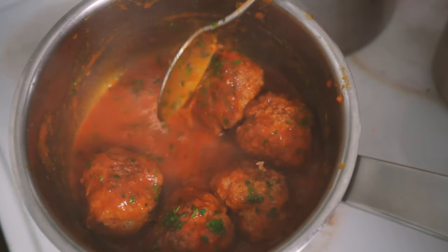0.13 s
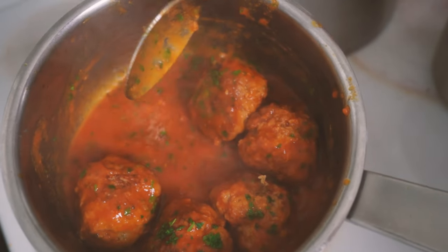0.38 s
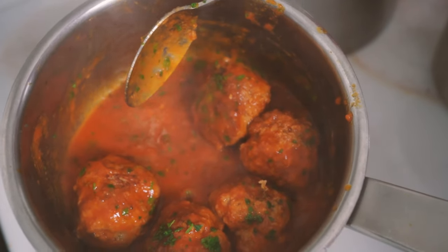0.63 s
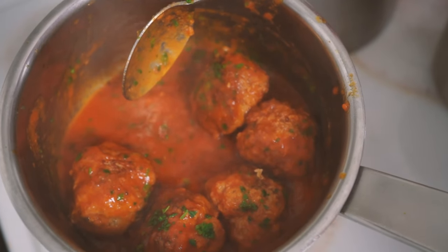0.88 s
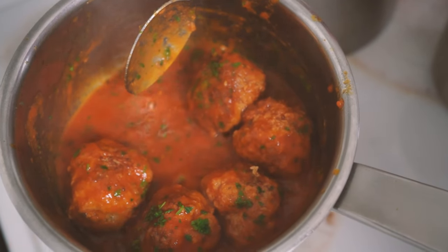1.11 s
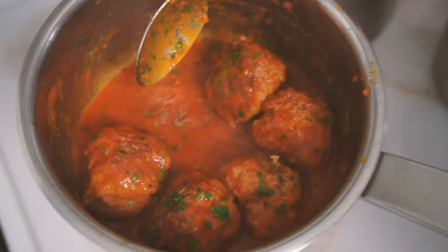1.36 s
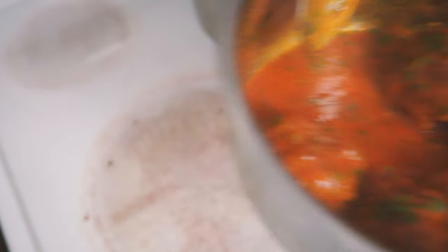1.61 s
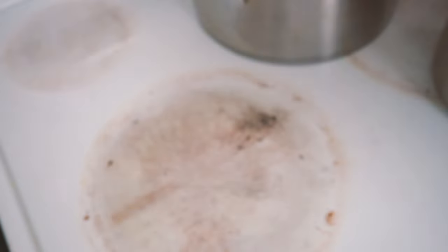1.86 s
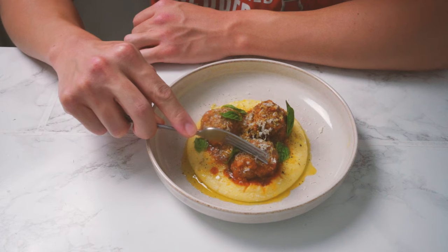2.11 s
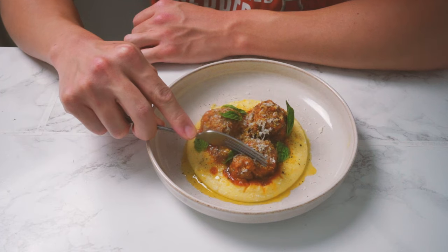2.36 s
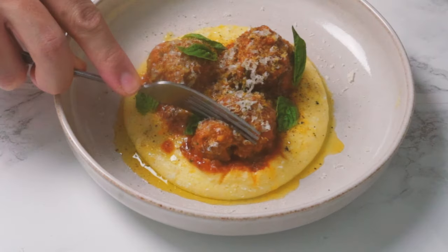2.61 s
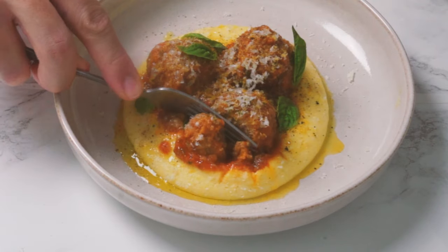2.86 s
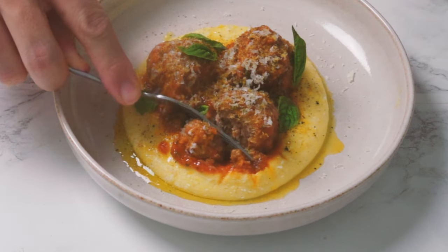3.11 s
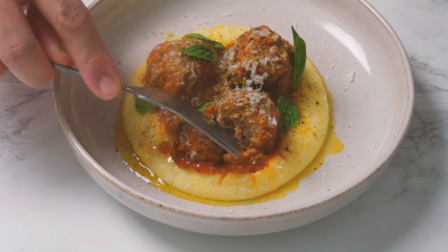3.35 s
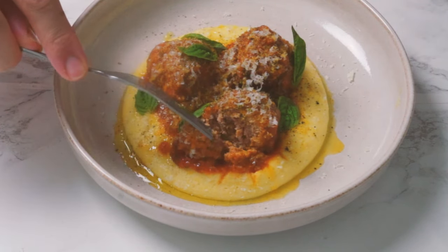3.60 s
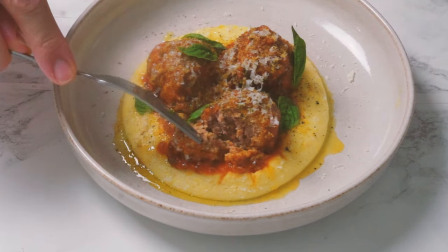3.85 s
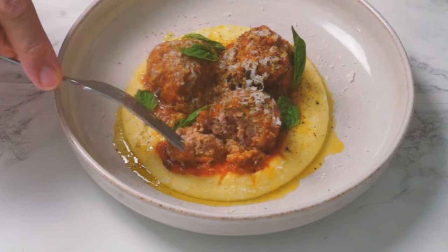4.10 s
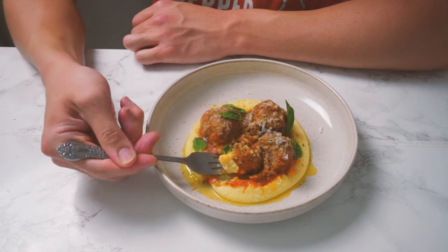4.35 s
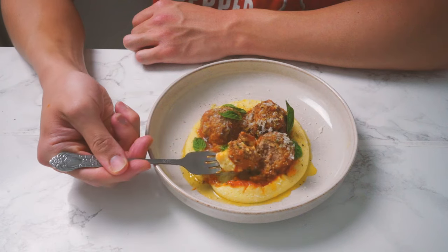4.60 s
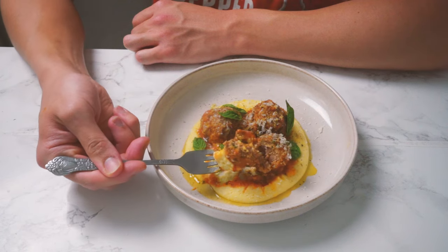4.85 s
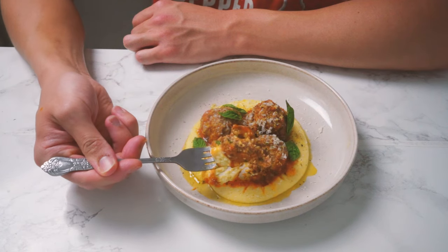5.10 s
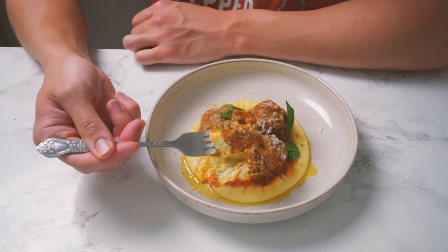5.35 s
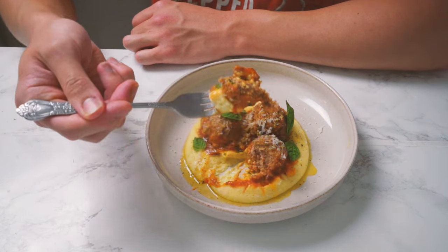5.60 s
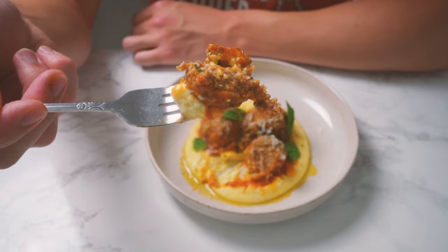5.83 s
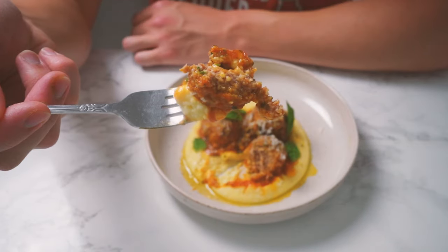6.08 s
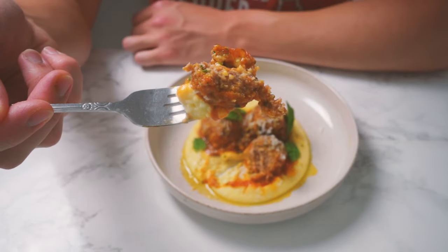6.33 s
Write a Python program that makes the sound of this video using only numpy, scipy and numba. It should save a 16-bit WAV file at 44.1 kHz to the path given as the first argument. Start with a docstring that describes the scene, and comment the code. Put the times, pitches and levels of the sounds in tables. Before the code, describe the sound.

From 0 to 1.95 seconds, thick sauce simmers close up in a steel pot: rapid crisp pops, wet snaps and fine fizz, brightest at the start, then duller and surging between short pauses. At about 0.34 a spoon hits the rim with a very loud, hard crack and a clear metallic ring fading over a few tenths of a second. Deep, soft low flutter shakes beneath. At 1.95 the boil stops abruptly, leaving a quiet counter with low fan hum, airy hiss and a thin fridge whine. From 2.5 to 3.3 a fork parts soft food with tiny high wet ticks, the strongest snap at 3.24. Sparse faint ticks follow. At 4.54 the fork clinks once on a ceramic bowl, ringing briefly in the small hard room. A very faint rustle passes around 5.5, with slight low flutter near 5.75; then drone until about 6.4.

```python
"""Thick sauce simmers in a steel pot: small air cavities ring and their films snap, and a spoon soon knocks the rim.
Then, at a stone counter, a fork cuts soft food with tiny wet ticks, rustles and strikes the ceramic bowl once.
The blows are a noisy crack and a set of fading tones; a small hard kitchen rings briefly after every sound.
Throughout, a fan (shaped noise) and a fridge (steady tones and hiss) drone, and the camera mount flutters deeply."""
import sys
import numpy as np
from scipy import signal
from scipy.fft import rfft, irfft
from scipy.io import wavfile
from scipy.ndimage import uniform_filter1d
from numba import njit

SR = 44100
rng = np.random.default_rng(int(sys.argv[2]) if len(sys.argv) > 2 else 0)


def inscribe(sig):
    """Save sig as 16-bit PCM at rate SR to the path in sys.argv[1].

    A 1-D sig is mono; a 2-D sig holds one channel per row.
    Samples are clipped to [-1, 1] before scaling.
    """
    pcm = np.round(np.clip(np.atleast_2d(sig).T, -1, 1) * 32767)
    wavfile.write(sys.argv[1], SR, pcm.astype(np.int16))


def gain_from_db(level_db):
    """Convert decibel levels to linear amplitude factors (20 dB per decade)."""
    decades = np.asarray(level_db, float) / 20
    return 10 ** decades


N = 284867
T = np.arange(N) / SR
BIN_HZ = np.arange(N // 2 + 1) * SR / N
CUT_S = 1.955  # the scene cuts from stove to counter

# strength of the boil, surging and pausing: (time [s], level of the coarse fizz [dB])
BOIL = [(0.01, -37), (0.07, -41), (0.115, -52), (0.18, -50), (0.22, -39), (0.31, -42), (0.56, -43),
        (0.63, -64.5), (0.76, -48), (0.95, -56.5), (1.02, -44), (1.09, -68.5), (1.15, -69), (1.2, -45),
        (1.385, -46.5), (1.42, -59.5), (1.47, -36), (1.51, -57), (1.57, -42.5), (1.64, -57.5), (1.7, -64),
        (1.75, -41.5), (1.88, -62), (1.93, -58.5)]


def level(x, db):
    """Scale to an rms level."""
    return x * gain_from_db(db) / np.sqrt(np.mean(x ** 2))


def band(x, hz, width):
    """Two-pole resonance, gain 1 at the centre."""
    return signal.lfilter(*signal.iirpeak(min(hz, .45 * SR), hz / width, SR), x)


def walk(rate):
    """Slow random wander with a spread near 1, made of random steps smoothed twice."""
    k = int(SR / rate)
    steps = np.repeat(rng.standard_normal(N // k + 1), k)
    return 1.3 * uniform_filter1d(uniform_filter1d(steps, k), k)[:N]


def coloured(power):
    """Noise with the given power in each frequency bin."""
    return irfft(rfft(rng.standard_normal(N)) * np.sqrt(power * len(power)), N)


def peaks(table):
    """Power per bin of steep resonances, each summing to its dB."""
    total = 0
    for hz, width, db in table:
        shape = 1 / (1 + (2 * (BIN_HZ - hz) / width) ** 2) ** 2
        total = total + gain_from_db(db) ** 2 * shape / shape.sum()
    return total


def echo(x, t60, db, damp_hz):
    """Dense hard-surface reflections, the treble dying first."""
    t = np.arange(SR // 2) / SR
    noise = rng.standard_normal(len(t)) * (t > .0025)  # nothing returns in the first 2.5 ms
    low = signal.lfilter(*signal.butter(1, damp_hz, fs=SR), noise)
    high = noise - low
    tail = low * np.exp(-np.log(1000) * t / t60) + high * np.exp(-np.log(1000) * t / (0.61 * t60))
    return x + gain_from_db(db) * signal.fftconvolve(x, tail / np.sqrt(np.sum(tail ** 2)))[:N]


@njit
def grains(start, gain, hz, cycles, glide, rise, count):
    """Damped sines that swell over a cycle or so; the pitch climbs as each cavity closes."""
    out = np.zeros(count)
    for j in range(len(start)):
        size = int(cycles[j] / hz[j] * SR)  # samples until 60 dB down
        phase = 0.
        for i in range(min(size, count - start[j])):
            phase += 2 * np.pi * hz[j] * (1 + glide * i / size) / SR
            swell = 1 - np.exp(-phase / (2 * np.pi * rise))
            fade = np.exp(-np.log(1000) * i / size)
            out[start[j] + i] += gain[j] * swell * fade * np.sin(phase)
    return out


def pops(s, db, hz, snap_db, cycles, snap_hz, snap_cycles, glide, rise):
    """Each burst rings a small air cavity and its film snaps with a broad click."""
    start = (s * SR).astype(np.int64)
    fade = np.log(1000) / cycles
    crest = rise * np.log(1 + 1 / (fade * rise))  # cycles until swell and fade balance
    peak = (1 - np.exp(-crest / rise)) * np.exp(-fade * crest)
    ring = grains(start, gain_from_db(db) / peak, hz, 0 * hz + cycles, glide, rise, N)
    snap = grains(start, gain_from_db(snap_db), 0 * hz + snap_hz, 0 * hz + snap_cycles, 0., 0.2, N)
    return ring + snap


def dulling(s):
    """Treble change in dB by time s: the boil is brightest at first and loses up to 15 dB."""
    return -15 * (1 - np.exp(-s / .6))


def bubbles():
    """The loud pops, lesser ones at random that follow the strength of the boil, and tiny high blips around each."""
    # loud pops in the sauce, and one low plop as the spoon settles:
    # (time [s], peak of the ring [dB], starting pitch [Hz])
    loud_pops = [(0.0079, -19, 5000), (0.0161, -20, 4900), (0.0246, -21, 5700), (0.0307, -23, 4090),
                 (0.0532, -20, 5200), (0.0566, -22.5, 4950), (0.1098, -31, 3140), (0.1416, -27, 8300),
                 (0.145, -17, 5380), (0.1468, -22, 6500), (0.2042, -24, 6930), (0.2246, -23, 4520),
                 (0.235, -25, 2760), (0.26, -26, 5080), (0.2783, -25, 3880), (0.2968, -14, 3660),
                 (0.2982, -21, 8200), (0.321, -20, 2630), (0.3331, -18, 4000), (0.426, -28.5, 796),
                 (0.4405, -19, 4800), (0.5283, -20, 3550), (0.54, -22, 3620), (0.546, -29, 8750),
                 (0.5519, -26, 3680), (0.565, -29, 10500), (0.5719, -30, 7150), (0.5839, -25, 5080),
                 (0.608, -25.5, 5020), (0.6516, -25.5, 4350), (0.6616, -28.5, 6140), (0.6939, -29, 3400),
                 (0.7451, -19.5, 5000), (0.7724, -17, 4310), (0.8146, -26, 4520), (0.8464, -28, 4610),
                 (0.8531, -29.5, 7100), (0.8923, -22.5, 4400), (0.9245, -27, 4020), (0.9735, -27, 6000),
                 (1.0095, -18, 5020), (1.0351, -23.5, 5540), (1.1697, -31.5, 3190), (1.1873, -28.5, 3270),
                 (1.1995, -22.5, 5120), (1.2136, -19.5, 3630), (1.2414, -21, 3570), (1.2624, -23, 3830),
                 (1.2729, -22, 5000), (1.297, -21, 3320), (1.3233, -15, 3330), (1.3562, -23, 4850),
                 (1.3664, -25, 3520), (1.3764, -22, 3700), (1.4428, -30, 5730), (1.4558, -27, 3750),
                 (1.4629, -19.5, 5100), (1.4734, -24, 3540), (1.5263, -28, 3270), (1.5307, -27, 5000),
                 (1.5627, -26.5, 3190), (1.5675, -24, 5460), (1.6, -27, 5600), (1.6152, -30.5, 4750),
                 (1.6681, -26, 8950), (1.7258, -26.5, 3750), (1.7304, -27, 7620), (1.7349, -23, 3160),
                 (1.7441, -18.5, 5120), (1.7621, -23, 5400), (1.7741, -25.5, 2630), (1.8084, -27.5, 1760),
                 (1.8150, -32, 1850), (1.8203, -29, 2280), (1.8421, -30.5, 5200), (1.8525, -29.5, 3430),
                 (1.8948, -30.5, 5250), (1.9168, -34, 2860)]
    when, size, pitch = rng.random((70, 3)).T
    s = when * CUT_S
    lesser_db = np.interp(s, *np.transpose(BOIL)) + 13 + 8.0 * size
    lesser = np.transpose([s, lesser_db, 3000. * (1 + 1.2 * pitch ** 1.5)])
    s, db, hz = np.vstack([loud_pops, lesser]).T
    snap_db = db - 5 + dulling(s) + 4.3 * rng.standard_normal(len(s))
    # six tiny random high blips scattered just before and after each pop
    spread_s, blip_db = .012, 3  # blip_db: strength of the strongest against the snap
    late, size, pitch = rng.random((len(s), 6, 3)).T
    start = ((s + spread_s * (late - .25)) * SR).clip(0).astype(np.int64).ravel()
    gain = gain_from_db(snap_db + blip_db - 9.0 * size).ravel()
    blips = grains(start, gain, 3000. * 4.6 ** pitch.ravel(), 0 * gain + 12.0, .05, .8, N)
    ringing = pops(s, db, hz, snap_db, cycles=16, snap_hz=10000., snap_cycles=3.5, glide=.08, rise=0.96)
    return ringing + blips


def fizz():
    """Swarms of small bubbles of scattered size, coarse and fine; pauses silence the fine ones less."""
    coarse_db = np.interp(T, *np.transpose(BOIL))
    fine_db = coarse_db - 6 + dulling(T) - .35 * (coarse_db + 40)
    out = 0
    for db, hz, spread, scatter in ((coarse_db, 3800., .38, 4.2), (fine_db, 10000., .28, 4.5)):
        chance = rng.random((1300, 3))
        start = (chance[:, 0] * CUT_S * SR).astype(np.int64)
        pitch = np.clip(hz * np.exp(spread * rng.standard_normal(len(chance))), 800, .4 * SR)
        size = gain_from_db(-scatter * np.log(chance[:, 1] + 0.0032))  # a few much louder than the rest
        swarm = grains(start, size, pitch, 4.0 + 11.0 * chance[:, 2], .1, .6, N)
        out = out + swarm / np.std(swarm[T < CUT_S]) * gain_from_db(db)
    return out


def air():
    """Power per bin of the fan's smooth broad hiss, summing to one."""
    # shape of the broad air noise: (frequency [Hz], relative density [dB per Hz])
    air_shape = [(40, -15.5), (100, -27), (400, -30), (1000, -7.5), (1500, -8.5), (2200, -17.5),
                 (3200, -19), (6000, -26), (8000, -32), (16000, -37)]
    hz, db = np.transpose(air_shape)
    power = gain_from_db(np.interp(np.log(BIN_HZ + 1), np.log(hz), db)) ** 2
    return power / power.sum()


def fan_drone(stove):
    """Fan noise swollen by the kitchen's standing waves, other ones at each place; its level wanders slowly."""
    # standing waves at the stove: (frequency [Hz], width 6 dB down [Hz], level [dB])
    stove_hum = [(95, 30, -70), (151, 30, -64), (198, 30, -58.5), (259.7, 28, -51.5), (326.1, 25.9, -54.5),
                 (390, 30, -67.5), (530.6, 60, -63), (650, 170, -60.5), (832, 310, -50), (1101.2, 301, -61)]
    # standing waves at the counter: (frequency [Hz], width 6 dB down [Hz], level [dB])
    counter_hum = [(95, 8.3, -63.5), (156, 29, -67.5), (194.2, 20.5, -56), (214, 13, -57), (259, 16, -55.5),
                   (281.2, 17, -56), (329.7, 26.7, -51), (391, 27, -67), (454.4, 35, -69), (528, 45, -62),
                   (601, 80, -63), (751, 161, -59), (885, 146, -57), (995, 43, -68), (1140, 310, -65)]
    # level of the broad hiss: (at the stove [dB], at the counter [dB])
    air_db = (-56.5, -61.5)
    hiss = air()
    at_stove = coloured(peaks(stove_hum) + hiss * gain_from_db(air_db[0]) ** 2)
    at_counter = coloured(peaks(counter_hum) + hiss * gain_from_db(air_db[1]) ** 2)
    drone = stove * at_stove + (1 - stove) * at_counter
    return drone * gain_from_db(0.69 * walk(2.3))


def compressor():
    """The fridge compressor: thin steady motor tones over the hiss of the shell."""
    # motor tones: (frequency [Hz], rms level [dB])
    whine = [(2169, -80.5), (2363, -82), (2530, -82.5), (3015, -85), (3354, -79), (3413, -76.5),
             (3472, -81), (3548, -81.5), (3591, -80.5), (3828, -86), (3887, -81), (4177, -89.5),
             (4495, -83), (4522, -85), (4554, -83.5), (4646, -92), (4791, -91), (5206, -89.5), (5265, -90),
             (5324, -83), (5383, -89), (5443, -89.5), (5502, -85), (5674, -86.5), (5916, -90),
             (6272, -95.5)]
    # hiss of the shell: (frequency [Hz], width 6 dB down [Hz], level [dB])
    shell = [(2200, 453, -79.5), (3440, 186, -78), (4520, 150, -84), (5500, 350, -82), (6350, 200, -89)]
    hz, db = np.transpose(whine)
    turn = np.exp(2j * np.pi * rng.random(len(hz)))  # random starting phases
    lines = np.zeros(len(BIN_HZ), complex)
    lines[(hz * N / SR).astype(int)] = gain_from_db(db) * N / np.sqrt(2) * turn
    return irfft(lines, N) + coloured(peaks(shell))


def flutter():
    """Two low resonances of the camera mount, shaken at random."""
    # strength of the shaking: (time [s], slow sway [dB], faster shake [dB])
    shaking = [(0.0, -43, -46), (0.32, -27.5, -53), (0.43, -33.5, -49), (0.68, -28.5, -53),
               (0.77, -38, -50), (0.9, -30, -51), (1.12, -41.5, -55), (1.2, -32, -55.5), (1.69, -41, -61),
               (1.85, -36, -61.5), (1.92, -29, -41), (2.07, -55.5, -62.5), (2.6, -57.5, -56),
               (3.3, -62.5, -68), (4.69, -66, -70.5), (4.8, -63.5, -49), (5.02, -70, -67), (5.6, -66, -75),
               (5.74, -48, -52), (6.46, -68, -60)]
    s, sway_db, shake_db = np.transpose(shaking)
    sway = coloured(peaks([(13.5, 5.0, 0)])) * gain_from_db(np.interp(T, s, sway_db))
    shake = coloured(peaks([(33.02, 6.9, 0.00028)])) * gain_from_db(np.interp(T, s, shake_db))
    return sway + shake


def blow(s, hit, modes, crack, rough):
    """A short noisy crack, then the struck modes swell and fade over a wash of countless weaker ones;
    wet food damps them all and makes them waver."""
    ring_db, crack_db, crack_t60, damped_t60, swell_s, wash_db, wash_t60, settle_s, settled_t60 = hit
    t = T[:SR // 2]
    swell = 1 - np.exp(-t / swell_s)
    ring = 0
    for hz, db, t60 in modes:
        waver = 1 + rough * level(uniform_filter1d(rng.standard_normal(len(t)), size=600), 0)
        fade = np.exp(-np.log(1000) * t * (1 / t60 + 1 / damped_t60))
        ring = ring + gain_from_db(db) * waver * fade * np.sin(2 * np.pi * hz * t)
    settled = np.exp(-np.log(1000) * (t - settle_s).clip(0) / settled_t60)
    sharp = gain_from_db(crack_db) * np.exp(-np.log(1000) * t / crack_t60)
    wash = gain_from_db(wash_db) * swell * np.exp(-np.log(1000) * t / wash_t60)
    burst = rng.standard_normal(len(t)) * (sharp + wash)
    noise = sum(gain_from_db(db) * band(band(burst, hz, width), hz, width) for hz, width, db in crack)
    out = np.zeros(N)
    out[int(s * SR):][:len(t)] = gain_from_db(ring_db) * swell * settled * ring + noise
    return out


def spoon_knock():
    """A spoon knocks the steel rim, whose many modes ring."""
    # the blow: (ring [dB], crack [dB], crack t60 [s], t60 that damping alone allows [s], swell of the ring [s],
    # wash [dB], wash t60 [s], time until the spoon settles on the rim [s], t60 of the extra damping then [s])
    pot_blow = (-7.5, 8.5, 0.0236, 1.3, 0.06, -7.5, 0.35, .095, .5)
    # modes of spoon and rim: (frequency [Hz], relative level [dB], t60 before damping [s])
    pot_modes = [(1205, -17, .2), (1306, -6, .25), (1759, -2, .45), (1828, -12, .3), (2040, -12, .3),
                 (2157, -11, .3), (2200, -8, .33), (2566, -11, .5), (2791, -15, .42), (3069, -11, .27),
                 (3239, 0, .36), (3467, -10, .22), (4489, -12, .4), (4775, -10, .5), (5518, -24, .4),
                 (6062, -19, .22), (6535, -13, .28), (7865, -6, .13), (8027, -20, .32), (8113, -10, .11),
                 (8516, -20, .24), (9039, -21, .4), (9480, -15, .17), (9814, -23, .36), (11350, -16, .38),
                 (11880, -23, .36), (12390, -23, .22), (13420, -22, .2), (14210, -18, .17),
                 (15150, -23, .14)]
    # colour of crack and wash: (frequency [Hz], width 6 dB down [Hz], gain [dB])
    pot_crack = [(1304, 360, -10.5), (2120, 650, 3.5), (3250, 1100, -1.5), (4800, 1300, 0),
                 (6500, 1300, -3), (8700, 2500, -1.5), (11500, 1400, 1), (13900, 1600, -13)]
    return blow(0.3365, pot_blow, pot_modes, pot_crack, rough=0.22)


def faint_ticks(first_s, last_s, db):
    """Sparse tiny ticks of juice while the fork works."""
    chance = rng.random((40, 3)).T
    start = ((first_s + (last_s - first_s) * chance[0]) * SR).astype(np.int64)
    gain = gain_from_db(db - 5.4 * np.log(chance[1] + .05))  # a few much louder than the rest
    return grains(start, gain, 8000. + 7000. * chance[2], 0 * start + 14.0, .05, 1.2, N)


def wet_ticks():
    """Food parts under the fork in tiny high rings with a snap, faint ones among them."""
    # the clearest ticks: (time [s], peak of the ring [dB], starting pitch [Hz], strength of the snap [dB])
    clear_ticks = [(2.5184, -30.5, 8400, -36), (2.5269, -40, 7940, -49), (2.5522, -41, 8500, -41),
                   (2.6117, -37, 8310, -29.5), (2.6178, -42, 8140, -35), (2.6503, -48, 11890, -39),
                   (2.6661, -33, 10600, -32.5), (2.7775, -40.5, 11700, -41), (2.8035, -27.5, 12000, -37),
                   (2.8263, -31, 9600, -31), (2.8507, -36, 8830, -33), (2.8746, -42, 11460, -33.5),
                   (2.8993, -44, 8740, -39), (2.9556, -34.5, 12020, -28.5), (3.1692, -44.5, 5500, -27),
                   (3.185, -48, 5210, -56), (3.2011, -40, 5200, -31), (3.2405, -23, 3600, -19),
                   (3.2408, -24, 5000, -30), (3.2417, -31, 6600, -32), (3.2486, -38, 5000, -42),
                   (3.2548, -42, 5300, -31), (3.2818, -53, 4640, -37), (3.8949, -46, 8700, -36),
                   (4.2516, -54, 14080, -49), (4.2955, -50, 15070, -41), (4.3604, -50, 5170, -34),
                   (4.3804, -50, 15420, -48), (4.4099, -41.5, 10720, -40), (4.4943, -34, 8600, -31),
                   (4.876, -54, 15120, -54), (5.5379, -49, 13700, -42), (5.6268, -53, 5600, -53)]
    s, db, hz, snap_db = np.transpose(clear_ticks)
    cycles = .0021 * hz  # every ring is 60 dB down after 2.1 ms
    clear = pops(s, db, hz, snap_db, cycles, snap_hz=11000., snap_cycles=6.0, glide=.05, rise=1.3)
    faint = faint_ticks(2.3, 3.45, -58) + faint_ticks(3.45, 4.5, -67) + faint_ticks(5.45, 5.65, -68)
    return clear + faint


def swells(rows):
    """Gain that climbs to each crest and falls again in straight lines."""
    return sum(gain_from_db(db) * np.interp(T, (s - rise, s, s + fall), (0, 1, 0)) for s, rise, fall, db in rows)


def rustle():
    """Fork and arm rustle: a thin and a dull hiss that swell and fade, flickering together."""
    # thin rustles: (crest time [s], rise [s], fall [s], level at the crest before flicker [dB])
    thin_rustle = [(4.535, .05, .01, -69), (5.55, 0.07, .08, -70.5)]
    # dull rustle: (crest time [s], rise [s], fall [s], level at the crest before flicker [dB])
    dull_rustle = [(5.5, .25, .18, -64)]
    thin = coloured(peaks([(11000., 8300.0, 0)])) * swells(thin_rustle)
    dull = coloured(peaks([(2200., 2900.0, 0)])) * swells(dull_rustle)
    return (thin + dull) * gain_from_db(2.0 * walk(60))


def bowl_strike():
    """The fork strikes the ceramic bowl, whose modes ring briefly."""
    # the blow: (ring [dB], crack [dB], crack t60 [s], t60 that damping alone allows [s], swell of the ring [s],
    # wash [dB], wash t60 [s], time until the fork settles on the rim [s], t60 of the extra damping then [s])
    bowl_blow = (-20, -1, 0.02, .33, .0005, -19.5, 0.1561, .3, 1.5)
    # modes of fork and bowl: (frequency [Hz], relative level [dB], t60 before damping [s])
    bowl_modes = [(150, -15, .3), (942, -4, .18), (1100, -6, .07), (1163, -18, .25), (2132, 4, .17),
                  (2358, -12, .22), (2460, -8, .22), (3268, -15, .32), (3494, -9, .5), (3548, -5, .3),
                  (4635, -20, .26), (4963, -5, .12), (4996, -13, .21), (6417, -9, .16), (6481, -6, .16),
                  (6761, -28, .22), (7526, -19, .13), (8070, -7, .19), (9744, -10, .09), (9943, -26, .17),
                  (11560, -32, .24), (12120, -20, .1), (13470, -23, .1), (15500, -28, .07)]
    # colour of crack and wash: (frequency [Hz], width 6 dB down [Hz], gain [dB])
    bowl_crack = [(1120, 150, -2), (2440, 600, 3), (3350, 500, -3), (4900, 600, -7), (6450, 600, -3),
                  (9700, 1500, -16.5), (12220, 900, -21)]
    return blow(4.5369, bowl_blow, bowl_modes, bowl_crack, rough=.25)


def scene():
    """Stove first, counter after; the droning kitchen and the flutter under both."""
    stove = np.clip((CUT_S - T) / 0.011 + .5, 0, 1)  # 1 at the stove, 0 at the counter
    pot = echo(bubbles() + fizz(), t60=.11, db=-8, damp_hz=8000.)
    drone = fan_drone(stove) + compressor()
    spoon = echo(spoon_knock(), t60=.2, db=-13.5, damp_hz=5000.)
    food = echo(wet_ticks() + rustle(), t60=.15, db=-8, damp_hz=9000.)
    bowl = echo(bowl_strike(), t60=0.23, db=-10, damp_hz=6000.)
    return (stove * pot + drone + flutter() + spoon + food + bowl)[None]


def roll_off(x):
    """The treble ends steeply here."""
    return signal.sosfilt(signal.butter(12, 16340, fs=SR, output="sos"), x)


def record(dry):
    """The top is cut above 16.2 kHz and the first swings of the loudest blow clip."""
    low_pass = signal.ellip(8, .2, 60, 16200, fs=SR, output="sos")
    cut = signal.sosfilt(low_pass, dry)
    return roll_off(np.clip(cut, -1, 1))


dry = scene()
out = record(dry)
inscribe(out)
```